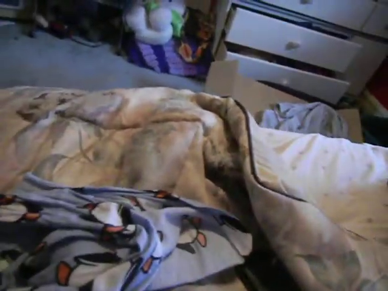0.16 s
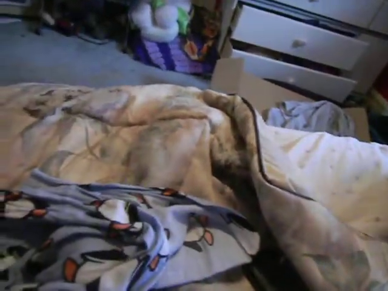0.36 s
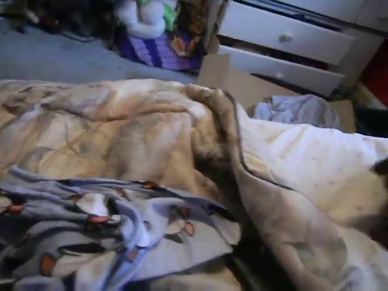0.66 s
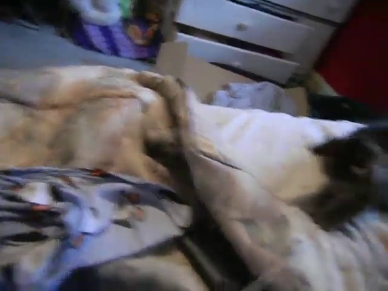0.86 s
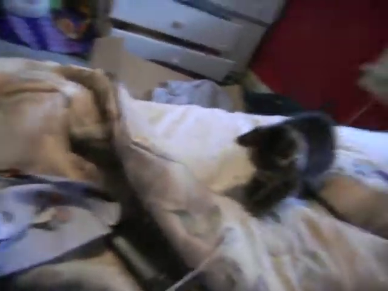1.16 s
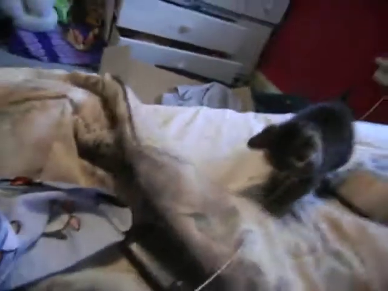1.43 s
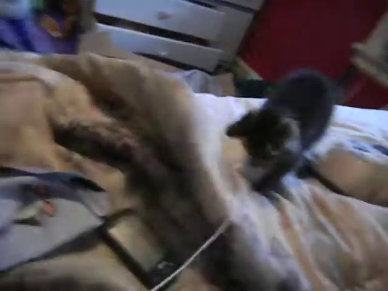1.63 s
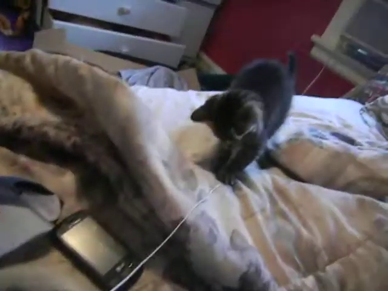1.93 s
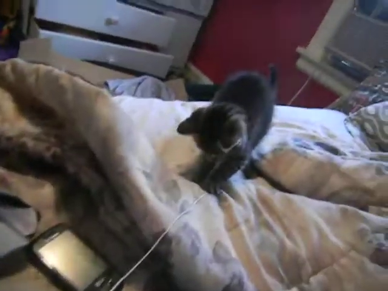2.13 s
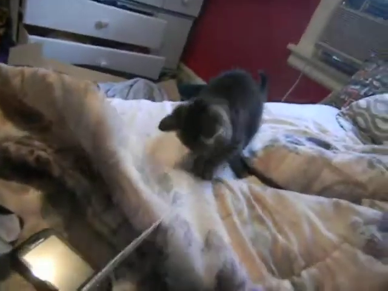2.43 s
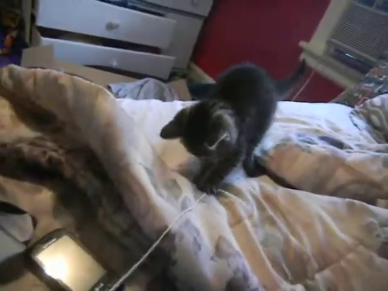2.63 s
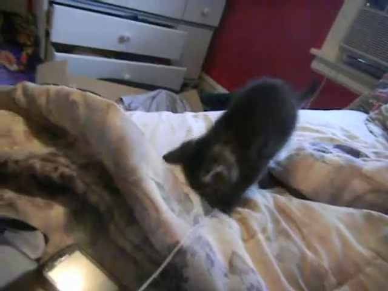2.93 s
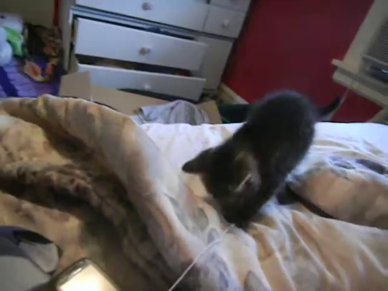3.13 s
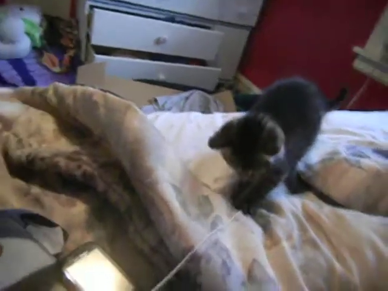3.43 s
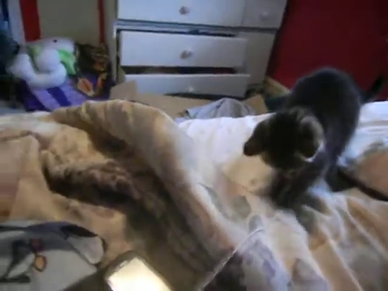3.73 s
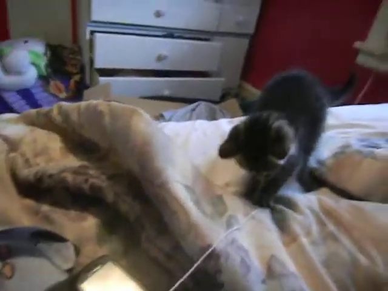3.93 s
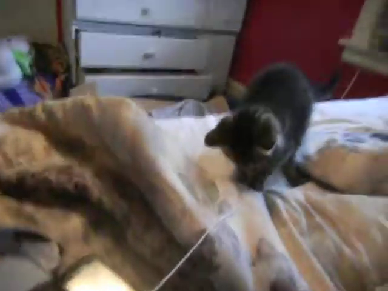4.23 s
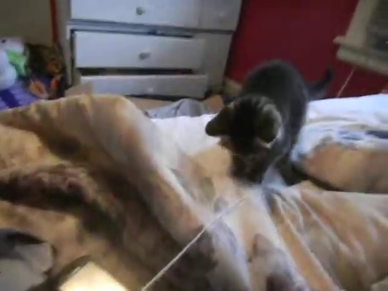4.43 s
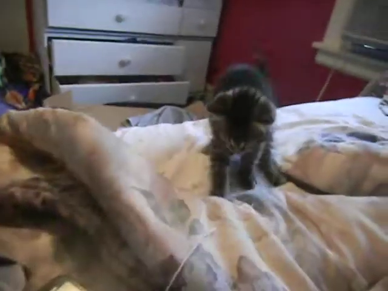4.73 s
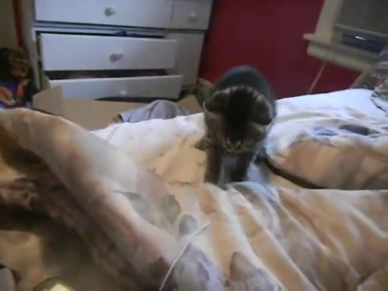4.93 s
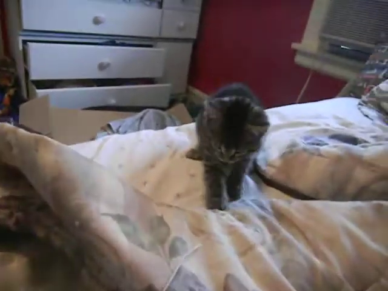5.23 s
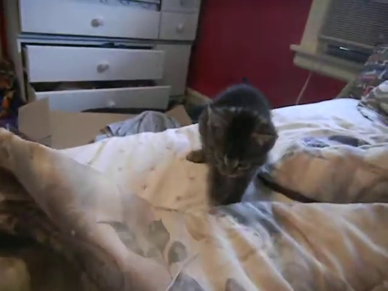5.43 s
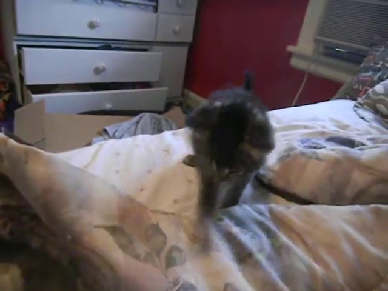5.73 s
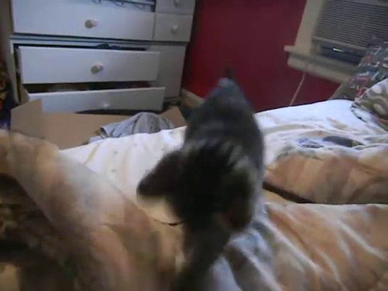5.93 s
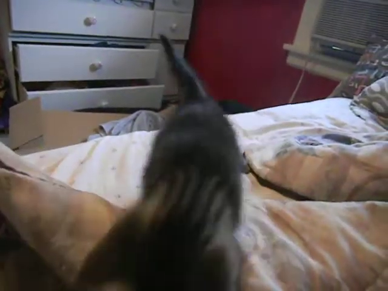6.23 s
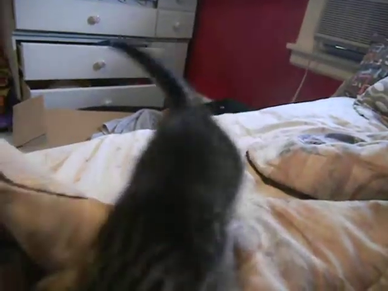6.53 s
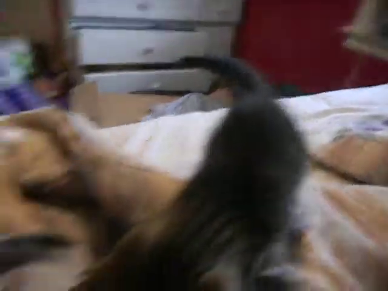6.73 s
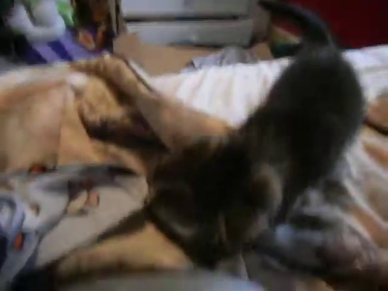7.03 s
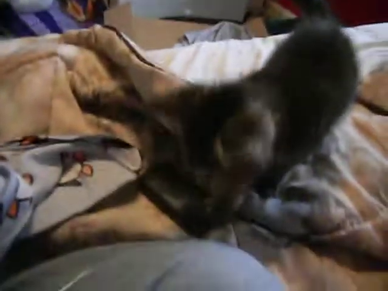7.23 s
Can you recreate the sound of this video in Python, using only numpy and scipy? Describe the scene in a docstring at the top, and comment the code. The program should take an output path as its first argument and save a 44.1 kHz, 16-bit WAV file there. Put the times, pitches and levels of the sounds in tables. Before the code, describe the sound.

A quiet, small bedroom heard through a close hand-held camcorder, mono and without the highest treble. Throughout there is airy hiss, a low electrical hum, a thin wavering motor whine around 3.5 kHz, and a soft rubbing swish about four times a second, with a faint squeak every half second. Paws rustle on the blanket at 0.2 s and around 0.8-1.4 s; faint ticks come near 0.4 s and a crisp one at 1.2 s. A brief, low creak falls in pitch at 1.8 s. Cloth drags from 2.5 s, with dull thumps at 2.7 s and the strongest scrape at 3.1 s. A rattling click cluster hits at 3.25 s. Clicks, knocks and rustles mix at 4.1-5.3 s, with low thumps at 5.3, 5.8 and 5.9 s. The swish peaks near 6 s; a last faint click comes at 6.4 s, and the whine dips before the motor noise continues to 7.4 s.

```python
"""A kitten chases a cord over bed blankets in a quiet bedroom, close to a hand-held camcorder.
Paws rustle from the start (enveloped noise) and the cord ticks on the shell (excited resonances);
a creak follows at 1.8 s, dull thumps from 2.7 s, the densest clicks and thumps at 3.2 to 5.9 s,
then one last click at 6.4 s. Throughout lie filtered room air, sine hum lines, and the drive's
wavering whine, noise-band gears and rhythmic swish, which is strongest near 6 s."""
import sys
import numpy as np
from scipy import signal
from scipy.fft import rfft, irfft, next_fast_len
from scipy.io import wavfile

SR = 44100
rng = np.random.default_rng(int(sys.argv[2]) if len(sys.argv) > 2 else 0)


def unload_wav(signal):
    """Save mono or channel-first audio to the path in sys.argv[1] as 16-bit WAV at rate SR, clipped to [-1, 1]."""
    wavfile.write(
        sys.argv[1],
        SR,
        np.round(np.clip(np.atleast_2d(signal).T, -1, 1) * 32767).astype(np.int16),
    )


N = 325017
TIME_S = np.arange(N) / SR

# Shell resonances, thump to tick. Each row: low edge in Hz, high edge in Hz, share of rattle
# against clean crack [0-1], mode in Hz, mode t60 in s, mode level against the broad part in dB.
SHELL_ZONES = [(154, 590, 0.2, 263, 0.083, -12), (596, 1560, 0.84, 1090, 0.029, -8),
               (1460, 2680, 1, 1960, 0.0088, -0.5), (3340, 4900, 0.87, 4150, 0.011, -8.5),
               (5180, 7840, 0.69, 6160, 0.0061, 3)]
# Spectrum of the fibres' hiss. Each row: frequency in Hz, relative level in dB.
FIBRE_HISS = [(1600, -22), (2800, -11.5), (3800, -11), (5000, -10), (7000, -9.5), (7900, -13.5),
              (8900, -20.5), (9500, -22)]


def from_db(db):
    """Amplitude factor of a level in dB."""
    return 10 ** (np.asarray(db) / 20)


def rms_one(x):
    """Scale to rms 1."""
    return x / np.sqrt(np.mean(x ** 2) + 1e-20)


def in_time(rows):
    """Each column of a curve, interpolated at every sample."""
    s, *columns = np.transpose(rows)
    return [np.interp(TIME_S, s, column) for column in columns]


def white():
    """White noise, rms 1."""
    return rng.standard_normal(N)


def shaped(x, gain_at):
    """Filter by a gain that depends on frequency."""
    size = next_fast_len(N + 4096)
    hz = np.maximum(np.fft.rfftfreq(size, 1 / SR), 1)
    return irfft(rfft(x, size) * gain_at(hz), size)[:N]


def coloured(x, spectrum):
    """Give x a spectrum of (Hz, dB) points, log-frequency between them; rms 1."""
    points_hz, points_db = np.transpose(spectrum)

    def gain_at(hz):
        db = np.interp(np.log(hz), np.log(points_hz), points_db, left=-60, right=-60)
        return from_db(db)
    return rms_one(shaped(x, gain_at))


def drift(rate_hz):
    """Slow chance: low-passed noise, rms 1."""
    return rms_one(shaped(white(), lambda hz: 1 / (1 + (hz / rate_hz) ** 2)))


def contacts(tail_s=0.011):
    """Each touch is a crack and a brief rattle that excite the shell's resonances."""
    size = 4096
    t = np.arange(size) / SR
    out = np.zeros(N + size)
    impulse = rms_one(1. * (t == 0))
    filters = [signal.butter(2, [low, high], "band", fs=SR, output="sos")
               for low, high, *_ in SHELL_ZONES]
    for start_s, levels_db, rattle_s, tail_db in touches():
        decay = np.exp(-t / rattle_s) + from_db(tail_db) * np.exp(-t / tail_s)
        rattle = rms_one(rng.standard_normal(size) * decay)
        at = int(start_s * SR)
        for k, (sos, zone, level_db) in enumerate(zip(filters, SHELL_ZONES, levels_db)):
            _, _, share, mode_hz, t60_s, mode_db = zone
            blow = (1 - share) * impulse + share * rattle
            broad = signal.sosfilt(sos, blow + 1e-18)
            # each resonance's pitch varies a little at random from touch to touch
            hz = mode_hz * (1 + 0.054 * rng.standard_normal())
            ringing = np.cos(2 * np.pi * hz * t) * np.exp(-np.log(1000) * t / t60_s)
            mode = signal.sosfilt(sos, ringing)
            answer = unit_blow(unit_blow(broad) + from_db(mode_db) * unit_blow(mode))
            # neighbouring resonances swing in opposite senses
            out[at:at + size] += (-1) ** k * from_db(level_db) * answer
    return out[:N]


def touches():
    """Cord clicks and dull thumps as (s, dB per resonance, rattle s, tail dB), tilted by brightness."""
    # Cord on shell. Each row: start in s, level in dB before the resonance gain, brightness in
    # dB per octave, place in dB (raises and lowers alternate resonances), rattle decay in s.
    clicks = [(0.3617, -55, 0, -6, .0002), (0.372, -54.5, 4, 1, .0002), (0.3891, -50, 3.5, -4, .0002),
              (1.14, -55, 4, 0, 0.00055), (1.2351, -33, 6.5, -1, 0.00034), (2.277, -53.5, 3.5, -4, 0.00017),
              (3.2405, -46, -2, 1.5, .005), (3.259, -47, 3.5, 0, .003), (3.266, -32.5, 1.8, 4, 0.0017),
              (3.2812, -43, 3, 0, .0022), (3.284, -41.5, 0.5, 5, 0.0013), (3.289, -33, 4.3, 2, .002),
              (4.1341, -49, 5, 0, 0.0019), (4.1379, -35, -1.6, -4, .00054), (4.196, -45.5, 4, 2, 0.00067),
              (4.4268, -47, 3, -1, .0003), (4.4333, -50, 6, 1, .0003), (4.4391, -38.5, 3.5, 2, 0.00054),
              (4.4455, -42, 1, 0, 0.00013), (6.4035, -51.5, 2, -2, .0008)]
    # Dull thumps on the shell, some under a cord click. Each row: start in s,
    # level in dB before the resonance gain, brightness in dB per octave.
    thumps = [(2.7101, -43, -5), (2.725, -36, -3), (3.244, -48.5, -7), (3.285, -53, -6), (4.138, -53, -15),
              (4.152, -40, -1.5), (4.196, -53, -13), (4.4122, -43.5, -2.4), (4.4333, -47, -15),
              (4.4455, -43, -13), (4.844, -37, -2.5), (4.8721, -41.5, -3), (4.916, -45.5, -0.7),
              (5.3053, -34.5, -3), (5.3104, -45.5, -0.5), (5.3154, -43, -1), (5.3245, -38, -3),
              (5.3332, -42.5, -1.5), (5.34, -41.5, -1.5), (5.7734, -39, -6), (5.8626, -42.5, -2)]
    # How readily each resonance answers a click, thump to tick [dB].
    click_gain_db = [-22, 1, -2, 2.5, -0.5]
    # The same for a thump [dB].
    thump_gain_db = [-.5, -2.5, -2.5, .5, 0]
    click_pivot_hz, thump_pivot_hz = 2960, 300  # where levels are stated
    thump_rattle_s = .0008
    click_tail_db, thump_tail_db = -33, -22.5  # the shell shivers on, more after a thump
    mode_hz = np.array([zone[3] for zone in SHELL_ZONES])
    place_sign = np.array([0, 1, -1, 1, -1])
    for start_s, db, brightness, place_db, rattle_s in clicks:
        tilt_db = brightness * np.log2(mode_hz / click_pivot_hz)
        yield start_s, db + tilt_db + place_db * place_sign + click_gain_db, rattle_s, click_tail_db
    for start_s, db, brightness in thumps:
        tilt_db = brightness * np.log2(mode_hz / thump_pivot_hz)
        yield start_s, db + tilt_db + thump_gain_db, thump_rattle_s, thump_tail_db


def unit_blow(x):
    """Scale a short sound to the energy of rms 1 over 10 ms."""
    return x / np.sqrt(np.sum(x ** 2) / (SR / 100))


def cloth(hiss_db=4.0, body_db=0, snags_per_s=1400, snag_share=0.76, catch_db=2.0):
    """Fibres slide with a hiss and a dense grain of tiny snags, catching unevenly, over a duller body."""
    # Paws drag over the blanket. Each row: fastest moment in s, rise in s, fall in s,
    # level in dB before hiss_db, body against that level in dB.
    strokes = [(0.175, 0.019, 0.043, -52.5, -6), (0.8, 0.093, 0.036, -60.5, 9.5),
               (0.92, 0.043, .08, -54, -6), (1.12, 0.099, 0.029, -56.5, -8), (1.43, 0.028, .05, -58.5, 3),
               (2.53, 0.11, 0.1, -47.5, -1.5), (2.86, 0.3, 0.14, -53.5, 2.5),
               (3.01, 0.082, 0.089, -49.5, 3.5), (3.112, 0.045, 0.027, -40.5, 2.5),
               (3.44, 0.043, 0.08, -54.5, -6), (4.385, 0.018, 0.098, -51.5, 1.5),
               (4.535, .025, .07, -48.5, -17), (4.65, 0.084, 0.076, -53, -8),
               (4.84, 0.08, 0.072, -50.5, -15), (4.96, .06, 0.056, -51, -2.5), (5.11, 0.066, 0.08, -50, -7),
               (5.2, 0.058, 0.1, -52, -1), (5.88, 0.013, 0.021, -59, 9)]
    # The bedding never lies quite still. Each row: time in s, level in dB before hiss_db.
    stir = [(0, -64), (2.1, -62.5), (3.6, -61.5), (7.37, -62.5)]
    # Spectrum of the cloth's body. Each row: frequency in Hz, relative level in dB.
    body_spectrum = [(400, -14.5), (900, -12), (1700, -2.5), (2400, -7), (3200, -6.5), (4500, -4.5)]
    stir_body_db = -3  # relative to the stir level
    sliding = from_db(in_time(stir)[0])
    pressing = from_db(stir_body_db) * sliding
    for peak_s, rise_s, fall_s, db, weight_db in strokes:
        level = from_db(db) * stroke(peak_s, rise_s, fall_s)
        sliding = np.hypot(sliding, level)
        pressing = np.hypot(pressing, from_db(weight_db) * level)
    snags = rms_one(white() * (rng.random(N) < snags_per_s / SR))
    hiss = from_db(hiss_db) * coloured(white() + snag_share * snags, FIBRE_HISS)
    body = from_db(body_db) * coloured(white(), body_spectrum)
    return from_db(catch_db * drift(60)) * (sliding * hiss + pressing * body)


def stroke(peak_s, rise_s, fall_s):
    """A paw speeds up and slows down again: a two-sided Gaussian."""
    away = (TIME_S - peak_s) / np.where(TIME_S < peak_s, rise_s, fall_s)
    return np.exp(-np.minimum(away ** 2, 20))


def claws(per_s=9, rms_db=-67):
    """Now and then a claw plucks a thread: random impulses with the fibres' spectrum."""
    plucks = (rng.random(N) < per_s / SR) * rng.uniform(.5, 1, N)
    return from_db(rms_db) * coloured(plucks, FIBRE_HISS)


def creak():
    """The grip creaks softly: a rough tone swells, falls in pitch and dies away."""
    # Columns: start in s, first pitch in Hz, final pitch in Hz, rise in s, envelope peak in dB.
    start_s, high_hz, low_hz, rise_s, peak_db = (1.835, 620, 400, .009, -39)
    age = np.maximum(TIME_S - start_s, 0) / rise_s
    hz = low_hz + (high_hz - low_hz) * np.exp(-age / 2)
    tone = np.sin(2 * np.pi * np.cumsum(hz) / SR) * (1 + .6 * drift(250))
    envelope = from_db(peak_db) * age * np.exp(1 - age)
    # keep the creak free of low rumble
    no_rumble = signal.butter(4, 230, "high", fs=SR, output="sos")
    return signal.sosfilt(no_rumble, envelope * tone + 1e-18)


def drive(grain_db=3.0, uneven_db=4.5):
    """The motor whines; a turning part rubs its guide twice a turn and squeaks about once a turn."""
    # Rub level at the height of a swell, before grain. Each row: time in s, level in dB.
    rub_level = [(0, -56), (3.5, -52), (5.3, -51), (6.1, -47.5), (6.6, -51.5), (7.37, -50)]
    # Spectrum of the rub. Each row: frequency in Hz, relative level in dB.
    rub_spectrum = [(300, -37.5), (700, -5), (1350, 4), (1900, -2.5), (2300, 1.5), (3200, -18),
                    (6000, -15.5)]
    # Spectrum of the squeak. Each row: frequency in Hz, relative level in dB.
    squeak_spectrum = [(4800, -24.5), (5800, -0.5), (6500, -2.5), (7300, 1.5), (8500, -14.5)]
    # Whine. Columns: pitch in Hz and level in dB at motor level 0, pitch rise in Hz per motor dB.
    whine_tone = (3553, -55.5, 1.31)
    # Low note, same columns: pitch in Hz, level in dB, pitch rise in Hz per motor dB.
    drone_tone = (471, -57.5, 0.11)
    turn_s, first_rub_s = .507, .055
    squeak_every_s, first_squeak_s, squeak_db = .5104, .283, -51.5

    rub_gain = from_db(in_time(rub_level)[0] + grain_db * drift(150))
    rub_swells = swells(first_rub_s, turn_s / 2, width_s=0.043)
    rub = rub_gain * rub_swells * coloured(white(), rub_spectrum)
    squeak_gain = from_db(squeak_db + uneven_db * drift(1.6))
    squeak_swells = swells(first_squeak_s, squeak_every_s, width_s=0.016)
    squeak = squeak_gain * squeak_swells * coloured(white(), squeak_spectrum)
    whine = motor_tone(whine_tone, wobble_hz=5, wander_hz=3.5, flutter_db=2.1)
    drone = motor_tone(drone_tone, wobble_hz=5, wander_hz=4, flutter_db=1.6)
    return rub + squeak + whine + drone + gears()


def motor_tone(tone, wobble_hz, wander_hz, flutter_db):
    """A sine whose pitch and level shake with the load on the motor."""
    # How strongly the motor sings. Each row: time in s, level in dB against its usual.
    motor_level = [(0, -1.5), (1.9, -0.5), (2.1, -5), (2.45, 3), (4.1, 0.5), (4.26, -6.5), (4.45, 1),
                   (5.6, 0), (6.35, -0.5), (6.55, -9.5), (7.37, -3)]
    base_hz, base_db, hz_per_db = tone
    motor_db, = in_time(motor_level)
    wander, wobble, flutter = drift(2), drift(14), drift(22)
    hz = base_hz + hz_per_db * motor_db + wander_hz * wander + wobble_hz * wobble
    phase = 2 * np.pi * np.cumsum(hz) / SR
    return np.sqrt(2) * from_db(base_db + motor_db + flutter_db * flutter) * np.sin(phase)


def swells(first_s, period_s, width_s):
    """A smooth bump once in every period."""
    offset_s = (TIME_S - first_s + period_s / 2) % period_s - period_s / 2
    return np.exp(-(offset_s / width_s) ** 2)


def gears():
    """Unsteady meshing spreads each tone into a narrow noise band; thin camera tones join them."""
    # Blurred gear tones. Each row: centre in Hz, width in Hz, rms level in dB.
    gear_tones = [(468, 12, -67), (1290, 210, -65), (2150, 140, -72.5), (3120, 27, -65), (3580, 73, -57.5),
                  (4060, 230, -59.5), (4855, 100, -59)]
    # Thin, steadier camera tones. Each row: centre in Hz, width in Hz, rms level in dB.
    thin_tones = [(1190, 8, -74), (1426, 10, -73), (2487, 10, -75), (4015, 10, -70), (4500, 10, -73.5),
                  (5566, 10, -70.5), (6508, 14, -72), (7579, 12, -67.5), (8419, 8, -75)]

    def peaks(hz):
        power = 0
        for centre_hz, width_hz, rms_db in gear_tones + thin_tones:
            height = from_db(2 * rms_db) * SR / (np.pi * width_hz)
            power = power + height / (1 + ((hz - centre_hz) / width_hz) ** 2) ** 2
        return np.sqrt(power)
    return shaped(white(), peaks)


def room():
    """Even air and microphone noise with steady mains and fan hum lines."""
    # Hum lines. Each row: frequency in Hz, rms level in dB.
    hum_lines = [(60, -90), (120, -68), (225, -58), (232, -68), (300, -69), (360, -72), (455, -70),
                 (682, -71.5)]
    # Spectrum of room air and microphone hiss. Each row: frequency in Hz, relative level in dB.
    air_spectrum = [(25, -41.5), (60, -20), (100, -11), (170, -1), (330, 3), (600, 0.5), (1200, -2),
                    (1950, -9), (2900, -8), (3700, -0.5), (4550, -10), (5300, -3), (6200, -14.5),
                    (7400, -7), (9500, -33.5)]
    air_rms_db = -49.5
    hum = np.zeros(N)
    for hz, rms_db in hum_lines:
        cycles = hz * TIME_S + rng.random()
        hum += np.sqrt(2) * from_db(rms_db) * np.sin(2 * np.pi * cycles)
    return hum + from_db(air_rms_db) * coloured(white(), air_spectrum)


def scene():
    """Sum all sources; one microphone feeds both channels."""
    mono = contacts() + cloth() + claws() + creak() + drive() + room()
    return np.tile(mono, (2, 1))


def record(dry):
    """The microphone's treble rolls off, then the top is cut steeply."""
    mic_top_hz, cutoff_hz = 8230, 9350
    rolloff = signal.butter(8, mic_top_hz, fs=SR, output="sos")
    steep_cut = signal.cheby2(16, 60, cutoff_hz, fs=SR, output="sos")
    return signal.sosfilt(steep_cut, signal.sosfilt(rolloff, dry))


dry = scene()
out = record(dry)
unload_wav(out)
```